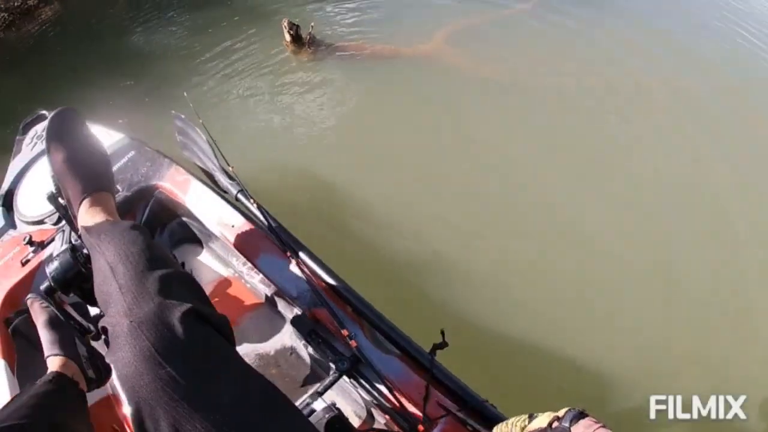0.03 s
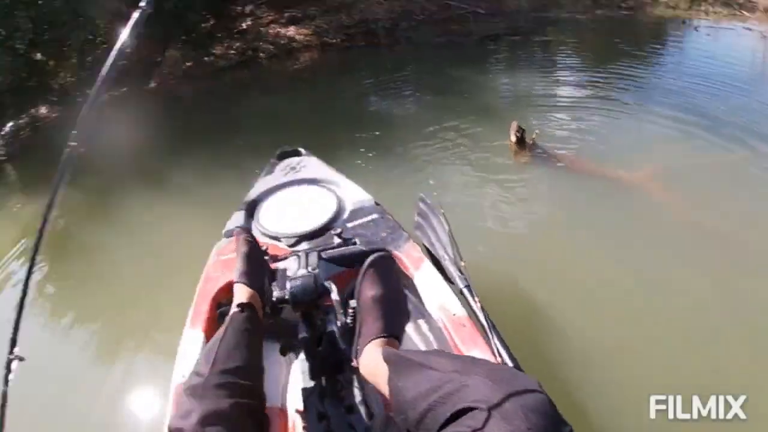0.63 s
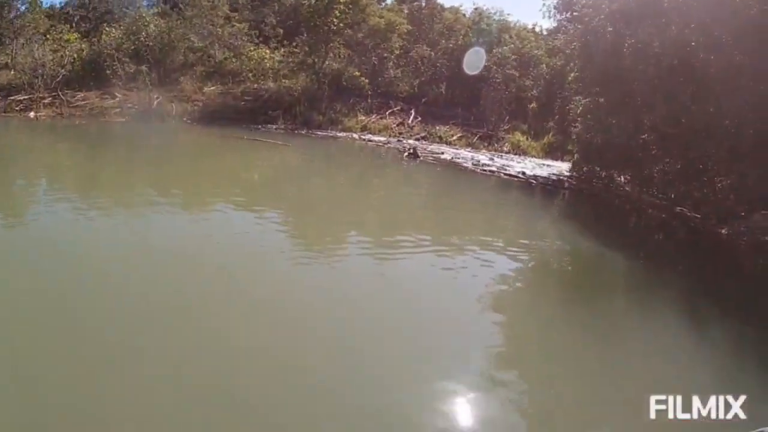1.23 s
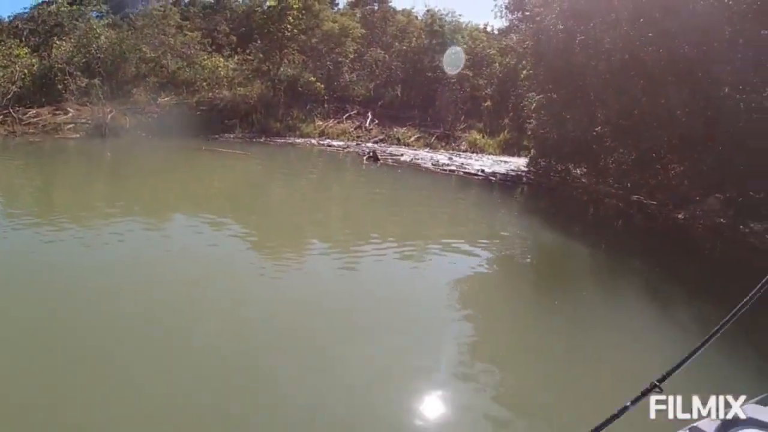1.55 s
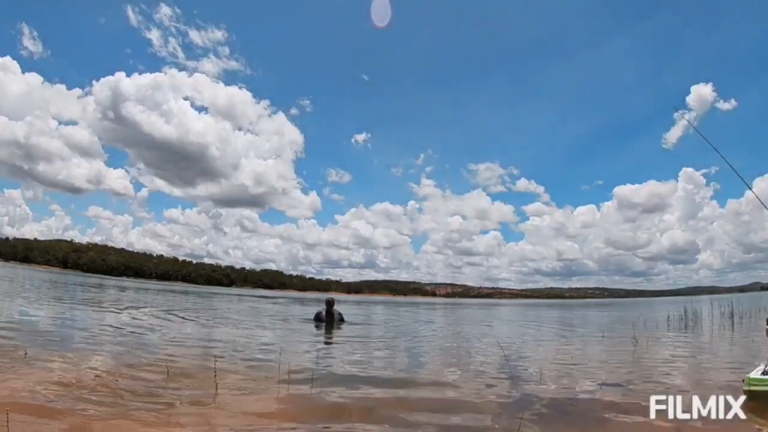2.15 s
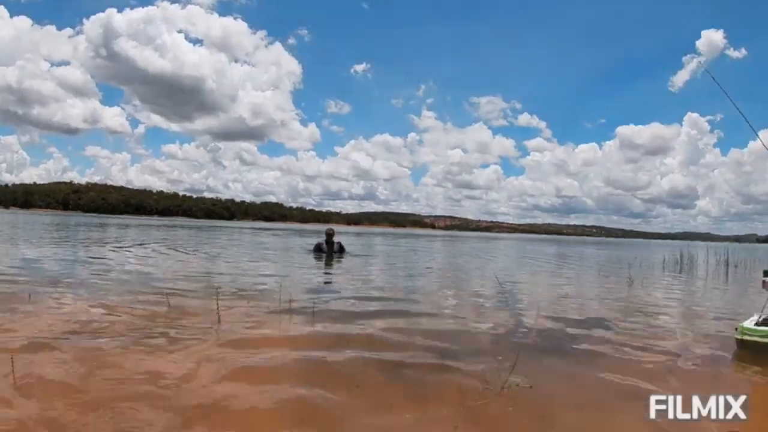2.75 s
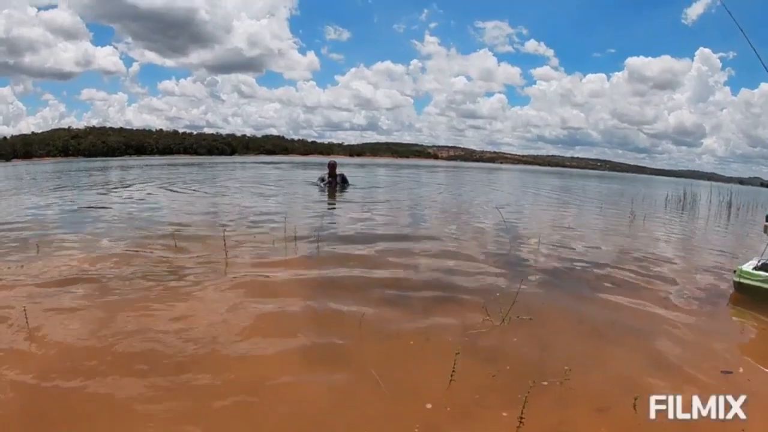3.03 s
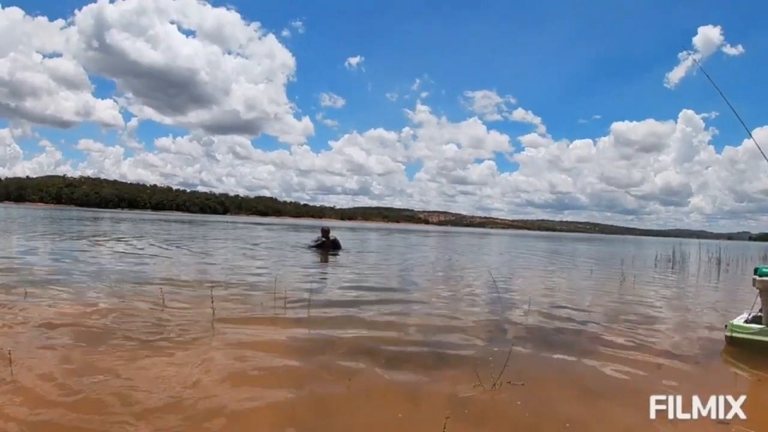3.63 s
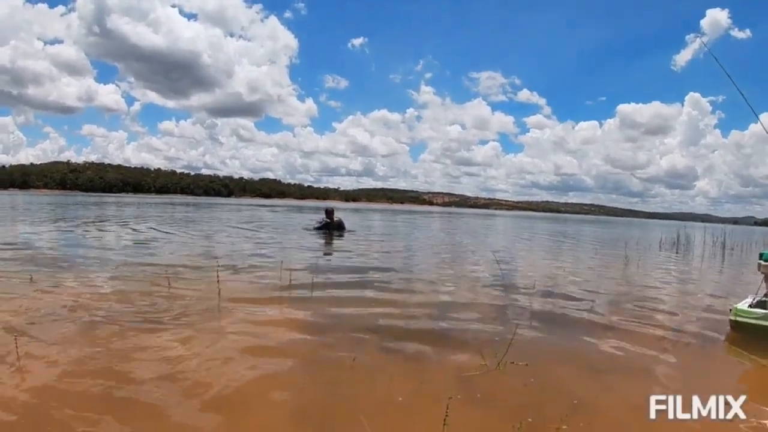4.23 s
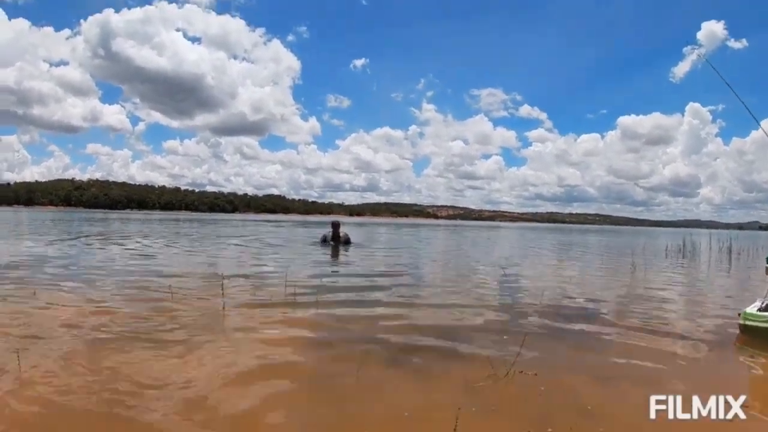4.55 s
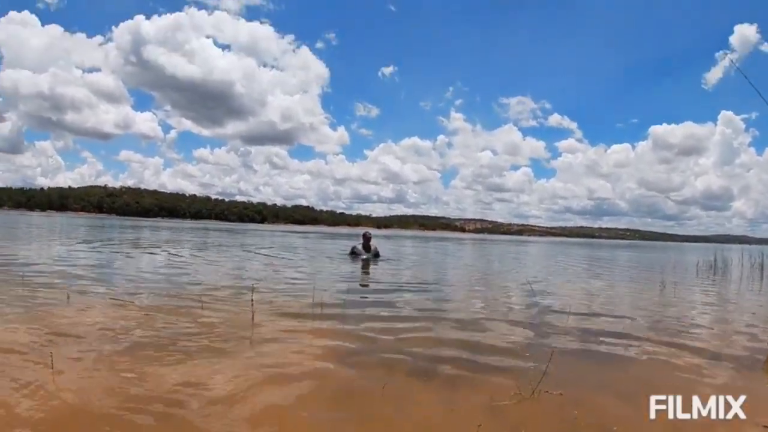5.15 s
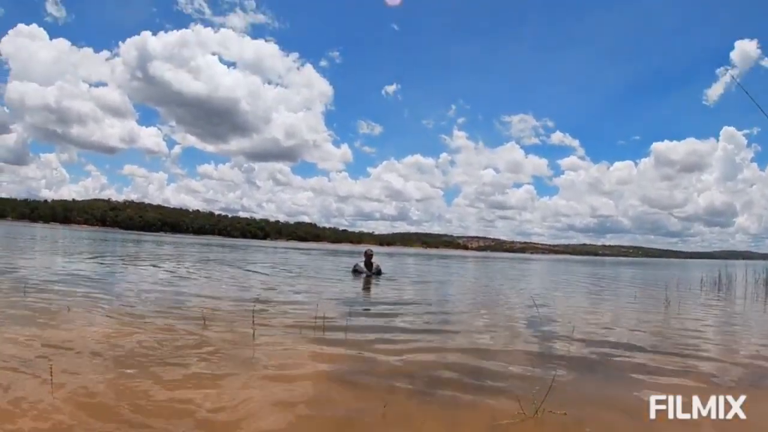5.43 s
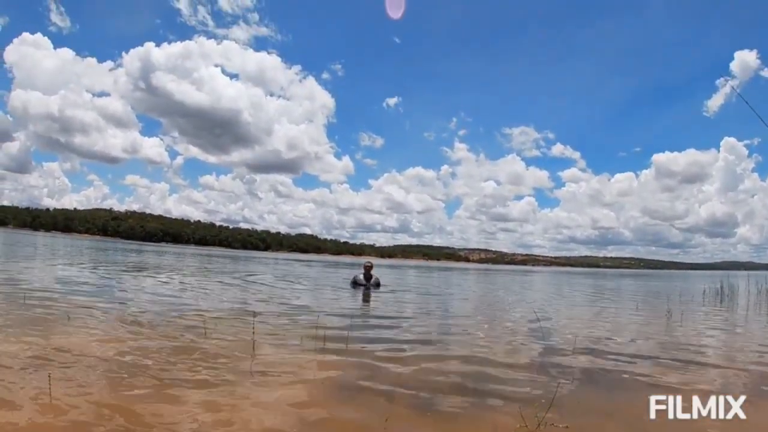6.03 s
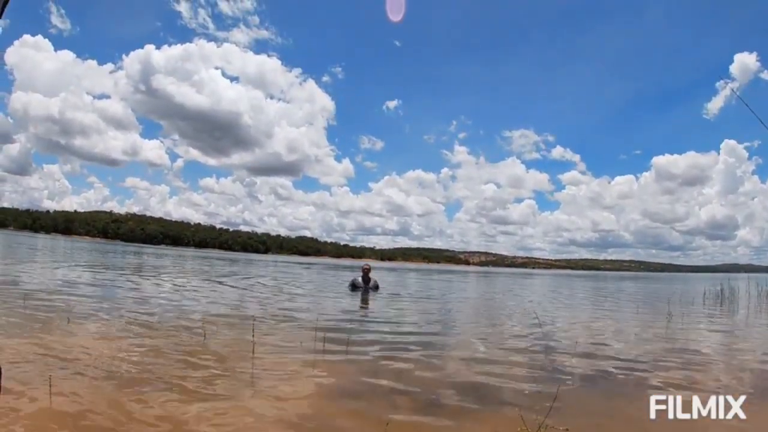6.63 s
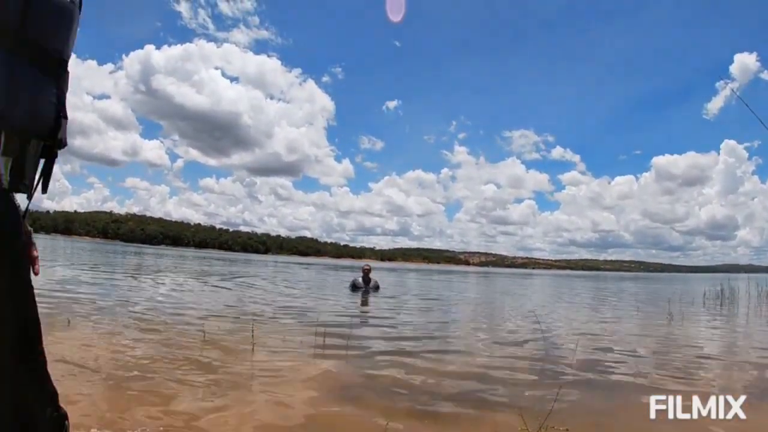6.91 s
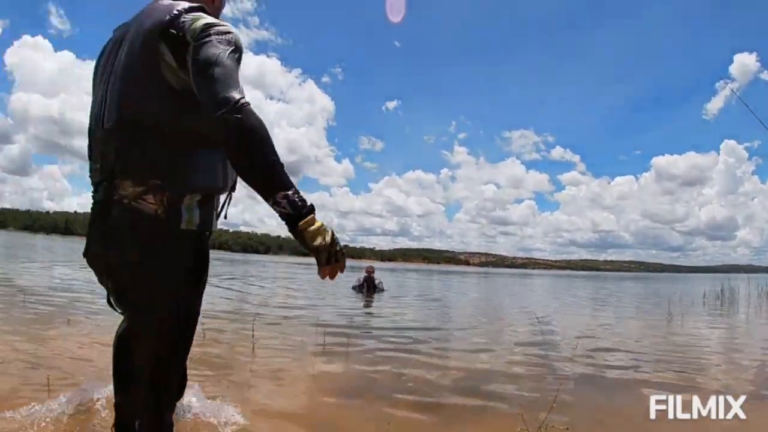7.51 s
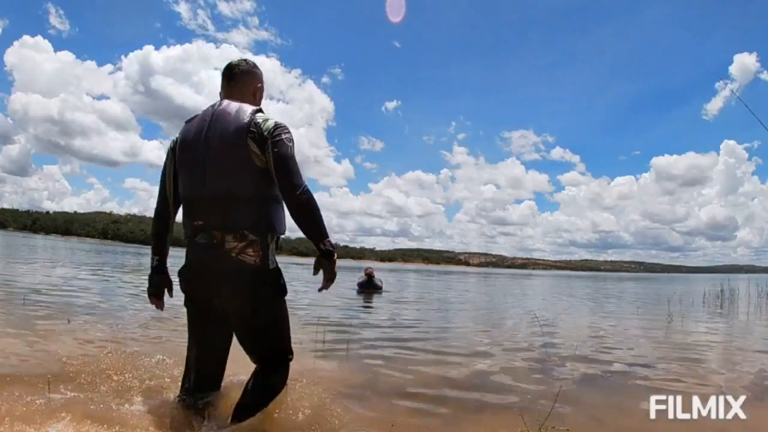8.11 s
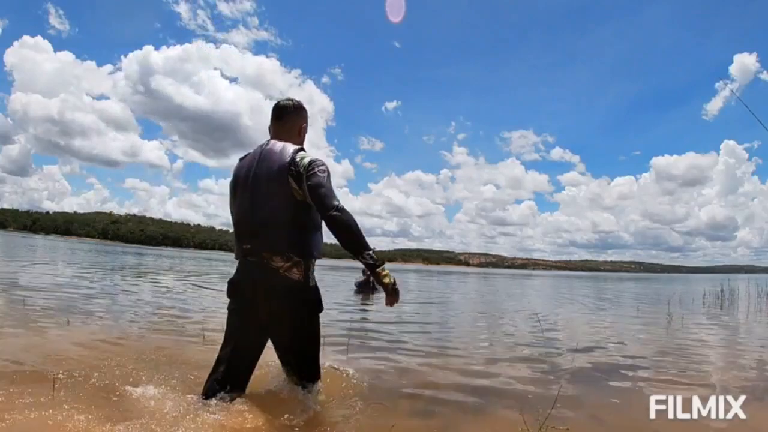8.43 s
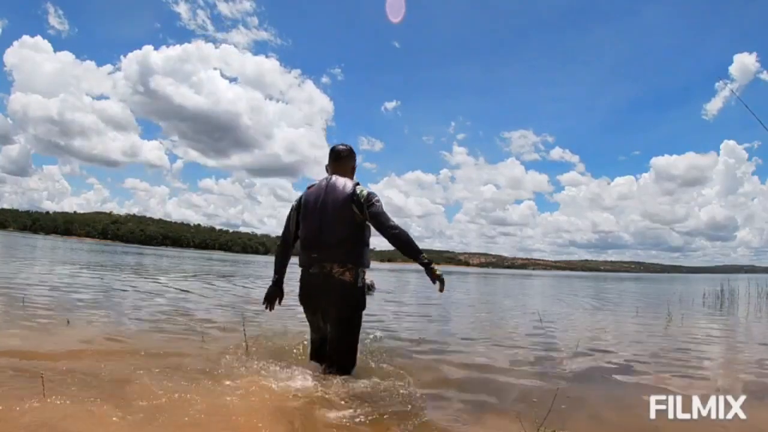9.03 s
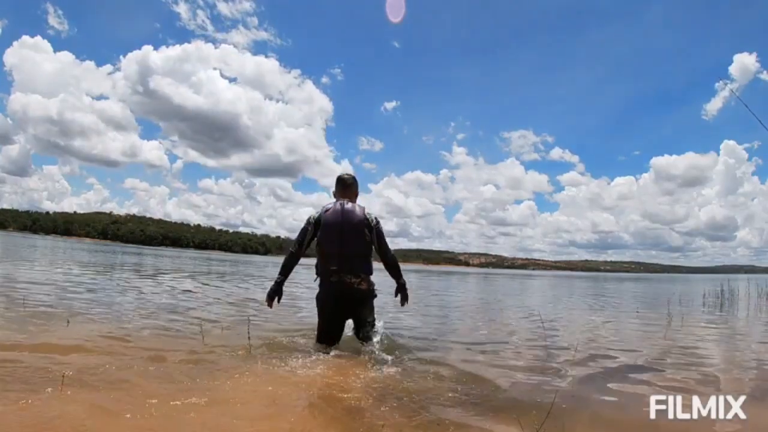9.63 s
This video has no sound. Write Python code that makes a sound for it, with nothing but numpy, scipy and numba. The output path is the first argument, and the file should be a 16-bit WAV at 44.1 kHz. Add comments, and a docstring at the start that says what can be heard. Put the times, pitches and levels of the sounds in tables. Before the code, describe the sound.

A kayak hull rumbles and knocks, small waves lap and plip at a shore, then legs slosh and splash through shallow water.

```python
"""A hollow rumble and knocks as someone shifts in a plastic kayak, wetsuit swishing: a leg sticks
and slips over the hull and sets it booming. Then a calm lake shore: ripples plip against the bank
as they close on air pockets, while a hand rumbles and bumps on the camera. Last and loudest,
a man strides past into the shallows, each leg churning up ringing bubbles and throwing spray."""
import sys
import numpy as np
from scipy import signal
from scipy.fft import rfft, irfft, next_fast_len
from scipy.io import wavfile
from scipy.ndimage import uniform_filter1d
from numba import njit

SR = 44100
rng = np.random.default_rng(int(sys.argv[2]) if len(sys.argv) > 2 else 0)


def put_to_file(sound):
    """Save the sound as 16-bit audio at rate SR, in the file named by the first command-line argument."""
    columns = np.atleast_2d(sound).T  # one column per channel
    safe = np.clip(columns, -1, 1)
    whole_steps = np.round(safe * 32767)
    wavfile.write(sys.argv[1], SR, whole_steps.astype(np.int16))


N = 435266
TIME = np.arange(N) / SR
CUTOFF_HZ = 15700


def from_db(db):
    return 10 ** (np.asarray(db) / 20)


def rms_one(x):
    return x / np.sqrt(np.mean(x ** 2) + 1e-20)


def add(out, start_s, sound):
    """Mix a short sound in at start_s."""
    at = max(int(start_s * SR), 0)
    out[at:at + len(sound)] += sound[:max(N - at, 0)]


def band(x, low_hz, high_hz):
    return signal.sosfilt(signal.butter(2, [low_hz, high_hz], "band", fs=SR, output="sos"), x)


def colour(x, spectrum):
    """Shape a white sound by rows of (freq_hz, density_db); rms 1."""
    hz, db = np.transpose(spectrum)
    size = next_fast_len(N + 4096)
    freqs = np.maximum(np.arange(size // 2 + 1) * SR / size, 1)
    skirts = np.minimum(freqs / hz[0], 1) ** 2 * np.minimum(hz[-1] / freqs, 1) ** 2
    curve = from_db(np.interp(np.log(freqs), np.log(hz), db))
    return rms_one(irfft(rfft(x, size) * skirts * curve, size)[:N])


def noise(spectrum):
    return colour(rng.standard_normal(N), spectrum)


def even(x, window_s):
    """Hold the slow level at 1 and keep the grain."""
    return x / np.sqrt(np.maximum(uniform_filter1d(x ** 2, int(window_s * SR) + 1), 1e-9))


def fader(rows):
    """A gain curve through rows of (time_s, level_db), fading out beyond both ends."""
    s, db = np.transpose(rows)
    fade = np.interp(TIME, [s[0] - .04, s[0], s[-1], s[-1] + .04], [0, 1, 1, 0])
    return fade * from_db(np.interp(TIME, s, db))


def swells(full_s, swell_s, db, hold_s, release_s):
    """Gain of overlapping events: each swells until full_s, holds and dies away; their powers add."""
    steps = TIME[::64]
    age = steps[:, None] - full_s
    shape = np.exp(-(np.minimum(age, 0) / swell_s) ** 2 - np.maximum(age - hold_s, 0) / release_s)
    return np.interp(TIME, steps, np.linalg.norm(from_db(db) * np.maximum(shape, 1e-9), axis=1))


def ping(hz, t60_s, attack_s):
    """A damped sine with a soft start."""
    t = TIME[:int(t60_s * SR) + 2]
    return np.sin(2 * np.pi * hz * t) * from_db(-60 * t / t60_s) * (1 - np.exp(-t / attack_s))


def tick(low_hz, high_hz, t60_s):
    """The brief, sharp noise of a small impact."""
    t = TIME[:SR // 40]
    return band(rng.standard_normal(len(t)) * from_db(-60 * t / t60_s), low_hz, high_hz)


@njit
def ring_bubbles(starts, steps, sizes, lengths, rises, n):
    """Sum of damped sines whose pitch climbs as each bubble nears the surface."""
    out = np.zeros(n)
    for k in range(len(starts)):
        height, fall = sizes[k], np.exp(-6.9 / lengths[k])
        for i in range(min(int(lengths[k]), n - starts[k])):
            out[starts[k] + i] += height * np.sin(steps[k] * i * (1 + rises[k] * i / lengths[k]))
            height *= fall
    return out


def bubble_cloud(cycles, spread_db, rise, count):
    """Many bubbles at random times and pitches, with a flat spectrum; rms 1."""
    when, pitch, ring, climb, force = rng.random((count, 5)).T
    hz = (11 + 112 * pitch) ** 2
    lengths = cycles * 2 ** (2 * ring - 1) * SR / hz
    accent_db = spread_db * np.minimum(-np.log(1 - force), 4)
    sizes = np.sqrt(np.sqrt(hz) / lengths) * from_db(accent_db) * rng.choice([-1, 1], count)
    starts = (when * N).astype(np.int64)
    return rms_one(ring_bubbles(starts, 2 * np.pi * hz / SR, sizes, lengths, rise * climb, N))


def air():
    """A faint, deep bed of open air."""
    spectrum = [(12, -52), (20, 2), (164, -28), (571, -26), (4950, -48), (15000, -55)]
    return from_db(-77.5) * noise(spectrum)


def hand_rumble():
    """The hand holding the camera makes a low rumble."""
    # tone of the rumble: freq_hz, density_db
    spectrum = [(20, -4.5), (70, 3.5), (115, -6.5), (175, -0.5), (260, -19), (500, -28)]
    # its rise and fall: time_s, relative_db
    levels = [(1.75, -59.5), (2.08, -72), (2.5, -54.5), (3.1, -48), (4.2, -44.5), (5.02, -38),
              (5.12, -50.5), (6.6, -57.5)]
    return from_db(-3.5) * fader(levels) * even(noise(spectrum), window_s=0.25)


def camera_bumps():
    """Fingers knock softly on the camera's housing: a low thud with a scuff."""
    # finger knocks: start_s, relative_db, pitch_hz, t60_s
    bumps = [(1.706, -45.5, 131, 0.095), (2.55, -48, 286, 0.12), (2.553, -41, 171.5, 0.22),
             (2.559, -32.5, 99, 0.12), (4.694, -29, 176, 0.078), (4.7312, -18, 60, 0.12),
             (4.729, -28, 145, 0.105), (4.926, -32.5, 82, 0.14), (5.324, -24, 145, 0.0051),
             (5.325, -41, 323, 0.078)]
    out, t = np.zeros(N), TIME[:SR // 4]
    for s, db, hz, t60 in bumps:
        add(out, s, from_db(db + 9.5) * ping(hz, t60, attack_s=0.001))
        scuff = rms_one(band(rng.standard_normal(len(t)), 98, 276)) * from_db(-60 * t / 0.29)
        add(out, s, from_db(db - 16) * scuff)
    return out


def wavelets():
    """Small waves lap, wash and fizz along the bank; two break in a short, bright spurt."""
    # waves reaching the bank, levels relative: full_s, swell_s, lap_db, wash_db, fizz_db
    waves = [(2.27, 0.099, -65.5, -72, -71.5), (3.2, 0.17, -60, -63.5, -81),
             (3.9, 0.047, -72, -60.5, -65.5), (4.44, 0.053, -85, -53, -73), (4.72, 0.13, -58, -48, -60.5),
             (5.34, 0.18, -62.5, -55, -63.5), (5.92, 0.22, -62, -61, -60.5),
             (6.15, 0.15, -56.5, -70, -63.5)]
    # the ripple between waves: time_s, relative_db
    ripple_levels = [(1.75, -78.5), (2.6, -76), (3.4, -68), (4.6, -75.5), (6.6, -63.5)]
    # tone of the foamy water: freq_hz, density_db
    spectrum = [(180, 1), (300, -2), (581, -1), (1220, 2), (2140, -6.5), (5760, -12.5), (6570, -18.5),
                (15500, -46.5)]
    # breaking crests: full_s, level_db
    crests = [(4.997, -53), (5.322, -58)]
    s, swell, lap_db, wash_db, fizz_db = np.transpose(waves)
    ripple = fader(ripple_levels)
    lap = np.hypot(swells(s, swell, lap_db, hold_s=0.04, release_s=0.17), from_db(-4) * ripple)
    wash = np.hypot(swells(s, swell, wash_db, hold_s=0.04, release_s=0.17), ripple)
    fizz = np.hypot(swells(s, swell, fizz_db, hold_s=0.04, release_s=0.19), from_db(-3) * ripple)
    crest_s, crest_db = np.transpose(crests)
    spurt = swells(crest_s, .006, crest_db, hold_s=.006, release_s=.016)
    foam = bubble_cloud(cycles=33, spread_db=3, rise=0.35, count=9000)
    water = colour(foam + from_db(0.5) * rng.standard_normal(N), spectrum)
    return (lap * rms_one(band(water, 284, 647))
            + from_db(-1.5) * wash * rms_one(band(water, 825, 3740))
            + from_db(2.5) * fizz * rms_one(band(water, 2190, CUTOFF_HZ))
            + spurt * rms_one(band(water, 1300, 6700)))


def plips():
    """Ripples slap shut on air pockets, whose notes mostly sweep up, ever faster as they shrink."""
    # trapped pockets: start_s, relative_db, first_hz, last_hz, sweep_s
    pockets = [(2.173, -66, 756, 2150, 0.014), (2.629, -52.5, 1005, 1630, 0.023),
               (2.668, -64.5, 800, 1670, 0.042), (3.088, -44, 830, 2250, 0.00085),
               (3.235, -55.5, 830, 1800, 0.023), (3.308, -51, 1000, 1300, 0.012),
               (3.58, -52.5, 2130, 2670, 0.011), (3.725, -55, 780, 1350, 0.026),
               (4.301, -46.5, 1210, 2330, 0.0072), (4.917, -46, 1320, 1940, 0.008),
               (4.9873, -39, 1570, 2200, 0.0028), (5.178, -56.5, 833, 2370, 0.023),
               (5.331, -45.5, 1275, 1990, 0.0178), (5.433, -50, 1160, 1250, 0.02),
               (5.669, -54, 1190, 2300, 0.015), (5.864, -49, 755, 700, 0.0089),
               (6.153, -45.5, 855, 980, 0.012), (6.244, -54.5, 1030, 1460, 0.03),
               (6.551, -57.5, 680, 980, 0.047)]
    out, t = np.zeros(N), TIME[:SR // 8]
    for s, db, first_hz, last_hz, sweep_s in pockets:
        age = t / sweep_s
        wobble = rms_one(band(rng.standard_normal(len(t)), 83, 420))
        hz = first_hz * (last_hz / first_hz) ** np.minimum(age ** 2, 1) * (1 + 0.08 * wobble)
        sustain_db = 10 * np.clip(np.log2(last_hz / first_hz), 0, 1)   # a squeezed pocket rings on
        ring = from_db((sustain_db - 4) * np.minimum(age, 2)) / (1 + age ** 20)
        note = (1 - np.exp(-t / 0.000092)) * ring * np.sin(2 * np.pi * np.cumsum(hz) / SR)
        spatter = rng.standard_normal(len(t)) * from_db(-60 * t / 0.32 + 1.2 * wobble)
        slap = band(band(spatter, 650, 3800), 650, 3800)
        add(out, s, from_db(db + 3) * note + from_db(db - 5.5) * slap)
    return out


def ringing_ticks():
    """A tick and a short, steady ring: a knock on the camera's housing, then drips leaving bubbles."""
    # the housing knock first, then the drips: start_s, level_db, pitch_hz, t60_s
    hits = [(1.707, -39, 1170, 0.042), (2.027, -58, 1070, 0.081), (2.302, -46, 1165, 0.048),
            (2.425, -58, 746, .12), (3.186, -43, 733, 0.058), (3.893, -49, 1005, 0.096),
            (4.063, -43.5, 880, 0.096), (4.414, -48, 920, 0.049), (5.313, -41, 890, .08),
            (5.378, -45, 853, .12)]
    out = np.zeros(N)
    for s, db, hz, t60 in hits:
        add(out, s, from_db(db) * ping(hz, t60, attack_s=.0002))
        add(out, s, from_db(db) * tick(hz, 3700, t60_s=.012))
    return out


def drops():
    """Single drops, and fine ones off the ripples' crests, tick and leave tiny ringing bubbles."""
    # drops that stand out: start_s, relative_db, pitch_hz
    loud = [(1.81, -50, 5590), (1.872, -53, 5450), (3.152, -46, 3460), (3.393, -49, 4050),
            (3.429, -46.5, 4370), (3.558, -47, 4150), (3.708, -51, 4200), (3.9734, -47, 4350),
            (4.1016, -45.5, 4640), (4.62, -44, 5900), (4.731, -42, 5610), (5.259, -52, 4160),
            (5.512, -46, 4330), (5.576, -47, 6030), (5.692, -35.5, 5400), (6.144, -41, 3620),
            (6.177, -46, 6600), (6.701, -18.5, 3200), (7.035, -22.5, 6170), (8.4145, -22.5, 4770),
            (8.807, -27, 5130)]
    fine = [(2.9 + 2.9 * when, -60.5 + 15.5 * size, 3200 + 3200 * pitch)
            for when, size, pitch in rng.random((48, 3))]
    out = np.zeros(N)
    for s, db, hz in [*loud, *fine]:
        add(out, s, from_db(db) * tick(.72 * hz, 1.103 * hz, t60_s=0.03))
        add(out, s, from_db(db - 3.5) * ping(hz, 0.016, attack_s=0.0001))
    return out


def wetsuit(rub_gain):
    """Folds of the wetsuit brush each other, and the suit hisses under every slide."""
    # brushing folds: full_s, swell_s, level_db
    folds = [(.44, 0.22, -46.5), (.92, 0.12, -61)]
    # tone of the fabric: freq_hz, density_db
    spectrum = [(590, -17), (1000, 2.5), (4010, 1), (5520, -5), (11100, -36), (15500, -33)]
    s, swell, db = np.transpose(folds)
    brush = swells(s, swell, db, hold_s=0.088, release_s=0.066)
    return np.hypot(brush, from_db(-20.5) * rub_gain) * noise(spectrum)


def hull_drag(boom_gain, rub_gain):
    """A leg sticks and slips over the hollow hull, which booms, chatters and groans."""
    # stick-slip of the leg: time_s, slip_rate_hz, groan_db
    friction = [(0, 42, -40), (.2, 42.9, -36), (.51, 40.3, -33), (.7, 40, -42), (.84, 42.5, -36.5),
                (1.171, 35, -38), (1.301, 34.5, -57), (1.62, 41, -54)]
    # multiples of the slip rate that the hull favours: multiple, relative_db
    partials = [(2, -3), (3, -1.5), (4, -36)]
    # tone of the hull's boom: freq_hz, density_db
    boom_spectrum = [(12, -34), (20, -0.5), (48, -15.5), (124, -7), (300, -27.5), (390, -35), (660, -120)]
    # tone of the rubbing: freq_hz, density_db
    rub_spectrum = [(100, -23), (180, 1.5), (270, -10), (400, -8), (520, -3), (660, -8.5), (920, -10.5),
                    (1100, -19.5), (2800, -31), (4500, -45.5)]
    s, rate_hz, groan_db = np.transpose(friction)
    grip = even(band(rng.standard_normal(N), 8.2, 38), window_s=0.14)
    slips = np.cumsum(np.interp(TIME, s, rate_hz) * (1 + 0.06 * grip)) / SR   # uneven jerks
    groan = sum(from_db(db) * np.sin(2 * np.pi * multiple * slips) for multiple, db in partials)
    boom = even(noise(boom_spectrum), window_s=0.033)
    judder = from_db(-13 * (slips % 1))   # each slip starts loud and dies back
    rub = even(colour(judder * rng.standard_normal(N), rub_spectrum), window_s=0.022)
    return boom_gain * boom + fader(np.c_[s, groan_db]) * groan + from_db(-2) * rub_gain * rub


def kayak():
    """Hull and wetsuit sound together as the leg slides, then stop quickly as the scene changes."""
    # the leg's slides, levels relative: full_s, hold_s, boom_db, rub_db
    slides = [(0.1, 0.49, -43, -41.5), (0.783, 0.25, -36.5, -39.5), (1.269, 0.019, -35.5, -42.5),
              (1.46, 0.15, -42, -43.5)]
    s, hold, boom_db, rub_db = np.transpose(slides)
    swell = np.minimum(0.27, hold / 2)   # short slides start more sharply
    boom_gain, rub_gain = (swells(s, swell, db, hold, release_s=0.14) for db in (boom_db, rub_db))
    end_s, fade_s = 1.577, 0.054
    fade = np.exp(-np.maximum(TIME - end_s, 0) / fade_s)
    return fade * (hull_drag(boom_gain, rub_gain) + wetsuit(rub_gain))


def knocks():
    """Blows ring a plastic shell's modes; each has its own brightness, from dull thud to sharp crack."""
    # blows on the hull, then two hard jerks of the slipping leg, the last on the camera's housing: start_s,
    # relative_db, brightness_db
    blows = [(0.243, -25, 4), (1.257, -29, -3.5), (1.262, -23.5, -7.5), (1.276, -30.5, 1),
             (1.289, -30, 3.5), (1.512, -28.5, -14), (1.537, -29.5, -23), (1.707, -38.5, 3)]
    # modes of the plastic shell: pitch_hz, relative_db, t60_s
    modes = [(70, -6, 0.16), (177, 4.5, 0.041), (328, -7.5, 0.11), (560, 0, 0.024), (890, -2, 0.028),
             (1460, -9, 0.026), (1780, -5, 0.012)]
    out, t = np.zeros(N), TIME[:SR // 3]
    for s, db, bright_db in blows:
        for hz, mode_db, t60 in modes:
            scatter, polarity = rng.standard_normal(2)
            tilt_db = bright_db * max(np.log2(hz / 600), 0) / 2
            level_db = db + mode_db + tilt_db + 2 * scatter - 4
            add(out, s, np.sign(polarity) * from_db(level_db) * ping(hz, t60, attack_s=0.00028))
        crack = band(rng.standard_normal(len(t)), 330, 2050) * from_db(-60 * t / 0.042)
        add(out, s, from_db(db + bright_db) * crack)
    return out


def wake():
    """The wader's wake rumbles faintly under his strides."""
    return fader([(6.5, -63.5), (9.87, -62)]) * rms_one(band(rng.standard_normal(N), 40, 150))


def glugs():
    """The hollow behind a plunging leg glugs: a narrow, gliding resonance, excited at random."""
    # hollows in the water: centre_s, swell_s, level_db, pitch_hz, glide_octaves_per_s
    hollows = [(6.77, 0.026, -32.5, 647, -2.5), (7.705, 0.026, -30.5, 550, 2),
               (8.405, 0.046, -28, 500.6, 5.5), (8.675, 0.016, -34.5, 318, 2.5), (9.13, 0.084, -34, 490, 4)]
    out, t = np.zeros(N), TIME[:SR // 2] - .25
    for s, swell, db, hz, glide in hollows:
        flutter = band(rng.standard_normal((2, len(t))), 2, 83)   # sets the resonance's width
        phase = 2 * np.pi * np.cumsum(hz * 2 ** (glide * t)) / SR
        ring = even(flutter[0] * np.cos(phase) + flutter[1] * np.sin(phase), window_s=0.089)
        add(out, s + t[0], from_db(db) * ring * np.exp(-(t / swell) ** 2))
    return out


def gulps():
    """A leg snaps large air pockets shut and they ring, rising a little; few cycles make a slap."""
    # large pockets: start_s, peak_db, pitch_hz, ring_cycles
    pockets = [(6.783, -22.5, 468, 18), (6.824, -23.5, 1790, 61), (7.283, -24.5, 850, 14),
               (7.308, -22.5, 1140, 19), (7.346, -26, 615, 16), (7.3638, -17, 545, 17),
               (7.393, -22, 520, 25), (7.461, -16.5, 1050, 22), (7.537, -23.5, 504, 13),
               (7.634, -21, 372, 9.5), (7.7493, -19.5, 586, 7.7), (8.114, -22.5, 720, 3.4),
               (8.127, -25.5, 1220, 22), (8.148, -23.5, 850, 9), (8.3504, -13.5, 726, 6.4),
               (8.363, -14, 423, 5.9), (8.583, -25.5, 254, 17), (9.398, -27, 447, 16),
               (9.616, -30, 640, 36), (9.787, -19.5, 830, 6.9)]
    out = np.zeros(N)
    for s, db, hz, cycles in pockets:
        age = TIME[:SR // 8] * hz   # in cycles
        shape = (1 - np.exp(-age ** 2)) * from_db(-60 * age / cycles)
        note = np.sin(2 * np.pi * age * (1 + 0.057 * age / cycles))
        add(out, s, from_db(db) * shape / shape.max() * note)
    return out


def wading():
    """Legs plough large bubbles under; the water they throw up rains back as fine spray."""
    # leg pushes, levels relative: full_s, swell_s, slosh_db, churn_db, spray_db
    pushes = [(6.7, 0.047, -42.5, -77, -44), (6.78, 0.046, -41.5, -42.5, -39.5),
              (6.95, 0.062, -35, -41, -39.5), (7.19, 0.066, -40.5, -40, -46.5),
              (7.395, 0.025, -39.5, -37.5, -46), (7.46, 0.057, -32.5, -42.5, -39.5),
              (7.591, 0.039, -34, -35, -42.5), (7.74, 0.062, -33.5, -39, -38), (7.99, 0.07, -65, -43, -44),
              (8.21, 0.075, -35.5, -39.5, -41.5), (8.309, 0.035, -32.5, -35, -49),
              (8.385, 0.025, -32.5, -36.5, -39.5), (8.455, 0.028, -35, -36.5, -50),
              (8.669, 0.034, -34, -38.5, -42.5), (8.96, 0.063, -44.5, -44, -44.5),
              (9.12, 0.2, -43, -38, -48), (9.48, 0.11, -47, -44, -48.5), (9.689, 0.027, -39.5, -37.5, -46),
              (9.779, 0.044, -34, -44.5, -42.5)]
    # tone of the splashing: freq_hz, density_db
    spectrum = [(115, -21), (160, -2), (215, -0.5), (378, -8), (508, -4.5), (1130, -4), (1400, -5.5),
                (3260, -13), (5400, -14), (8250, -37), (10900, -46), (12900, -41.5), (15600, -44)]
    # the largest bubbles grow louder as the water deepens: time_s, relative_db
    depth = [(6.7, -13), (8.4, -8.5), (9.87, -6.5)]
    bubbles = bubble_cloud(cycles=36, spread_db=2.5, rise=0.15, count=24000)
    crackle = bubble_cloud(cycles=22.4, spread_db=3.5, rise=0, count=22000)
    mist = band(rng.standard_normal(N), 740, CUTOFF_HZ)   # the finest drops merge into a hiss
    deep = colour(bubbles, spectrum)
    surface = colour(crackle + from_db(-2) * mist, spectrum)
    s, swell, slosh_db, churn_db, spray_db = np.transpose(pushes)
    hold_s, landing_s = 0.023, s + 0.0046   # thrown water lands a little later
    # the water stays stirred up round the wader, and fades as he walks off
    stir = swells(full_s=6.72, swell_s=0.066, db=0, hold_s=0.47, release_s=4.2)
    churn = np.hypot(swells(s, swell, churn_db, hold_s, release_s=0.099), from_db(-78) * stir)
    slosh = np.hypot(swells(s, swell, slosh_db, hold_s, release_s=0.088), from_db(-39.5) * stir)
    spray = np.hypot(swells(landing_s, swell, spray_db, hold_s, release_s=0.14), from_db(-47.5) * stir)
    splash = np.sqrt(slosh * spray)   # middle-sized bubbles come from both
    layers = [(deep, churn * fader(depth), 120, 220, -4), (deep, churn, 220, 450, -1.3),
              (deep, slosh, 450, 1400, -.3), (surface, splash, 1400, 3000, -2),
              (surface, spray, 3000, CUTOFF_HZ, -1.5)]
    out = np.zeros(N)
    for k, (water, gain, low_hz, high_hz, db) in enumerate(layers):
        polarity = (-1) ** k   # keeps neighbouring bands from cancelling
        out += polarity * gain * from_db(db) * even(band(water, low_hz, high_hz), window_s=0.13)
    return out


def scene():
    """The kayak, then the shore and the wader, over faint air; mono."""
    opening = kayak() + knocks()
    shore = wavelets() + hand_rumble() + plips() + ringing_ticks() + drops() + camera_bumps()
    wader = wading() + gulps() + wake() + glugs()
    return (opening + shore + wader + air())[None]


def record(dry):
    """A steep low-pass cuts the very top."""
    return signal.sosfilt(signal.ellip(10, .1, 80, CUTOFF_HZ, fs=SR, output="sos"), dry)


dry = scene()
out = record(dry)
put_to_file(out)
```